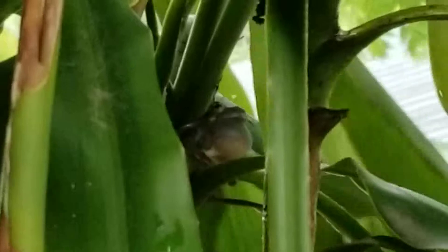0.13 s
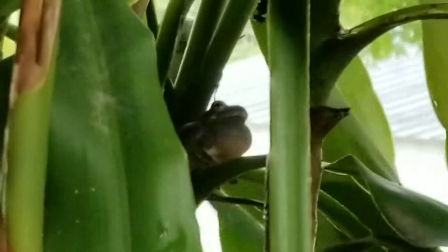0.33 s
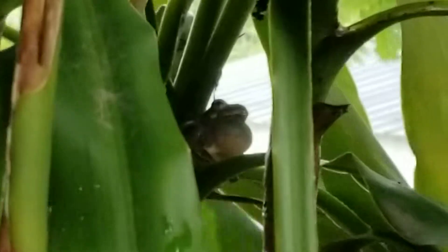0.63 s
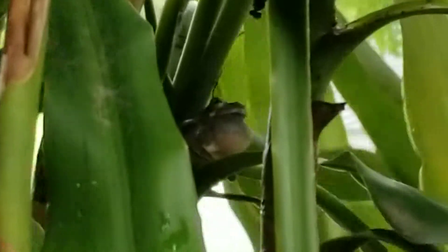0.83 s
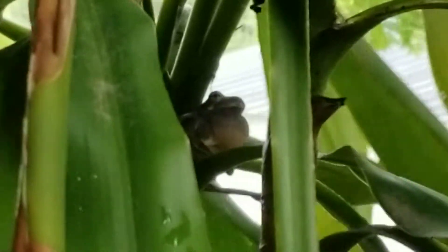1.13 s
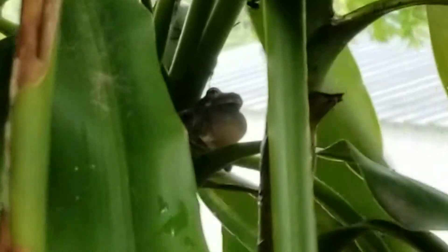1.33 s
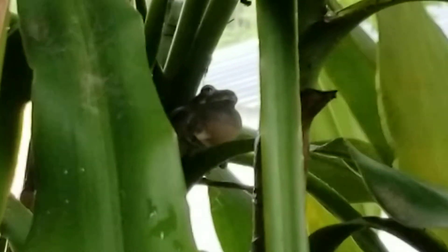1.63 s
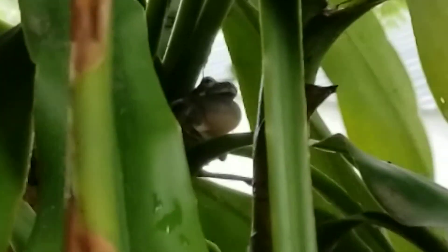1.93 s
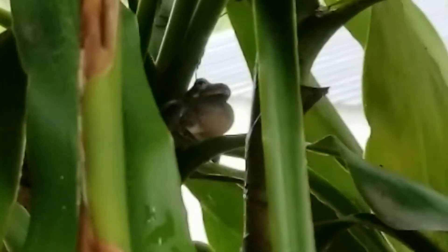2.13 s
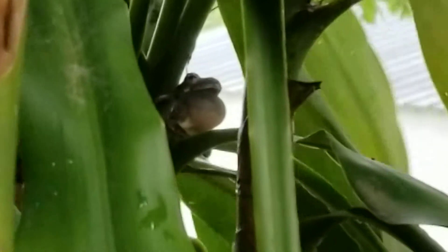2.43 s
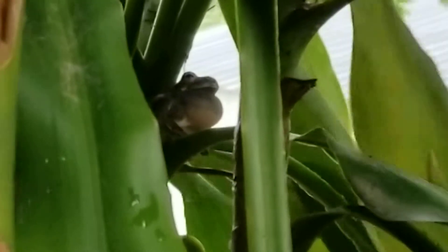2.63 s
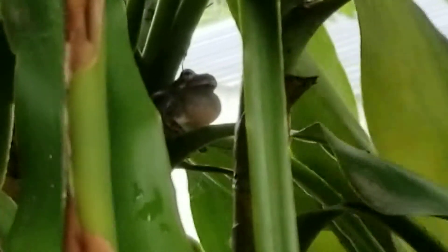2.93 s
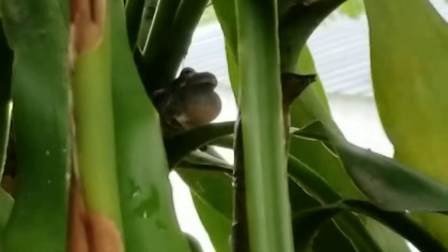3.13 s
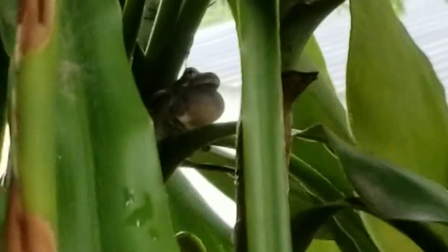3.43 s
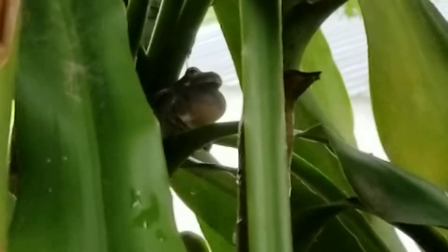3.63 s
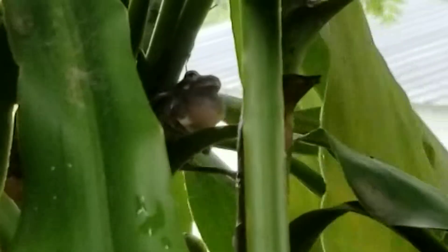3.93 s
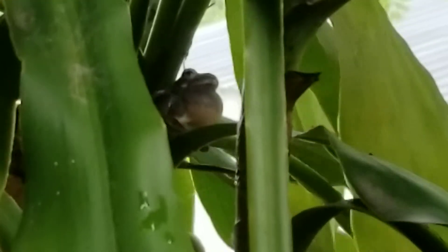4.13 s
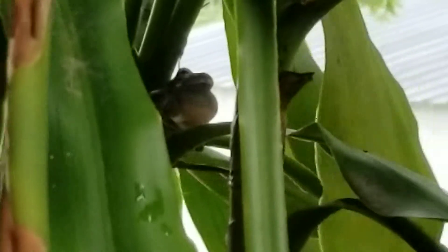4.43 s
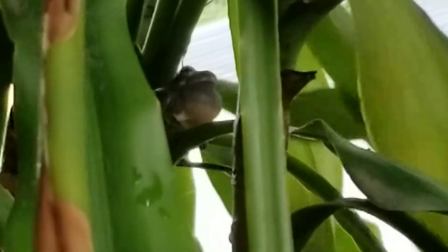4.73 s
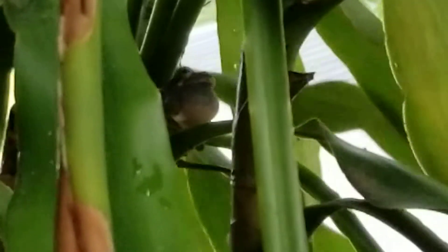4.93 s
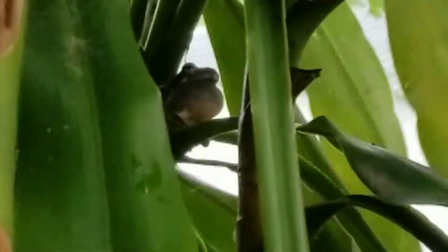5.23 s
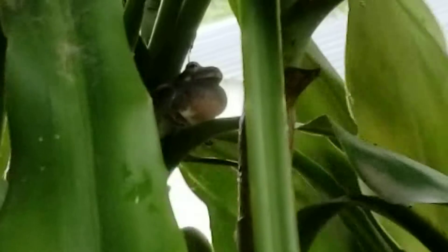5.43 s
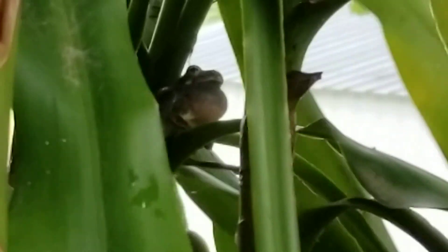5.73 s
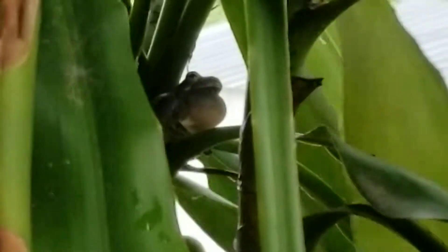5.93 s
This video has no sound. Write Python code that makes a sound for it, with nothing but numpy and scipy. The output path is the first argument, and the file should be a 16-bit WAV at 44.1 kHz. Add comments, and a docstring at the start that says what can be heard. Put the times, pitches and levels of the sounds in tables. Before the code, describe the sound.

Low wind buffets, scattered bird cheeps and lower far-off frog rattles surround one clear, close frog trill of a dozen rapid notes.

```python
"""A small frog on a leafy house plant gives a rattling croak of a dozen quick notes under a roof.
Each note is a pulsed stack of harmonics; lower frogs farther off answer in notes that come by several paths.
Small birds outside chirp in gliding sines, over a twitter of flickering noise bands.
Shaped noise makes the air buffeting the hand-held microphone, the leaves and the scuffs close by.
Single kicks of air hit the ports; noise bursts and ringing modes make a few light knocks and one snap."""
import sys
import numpy as np
from scipy import signal
from scipy.fft import rfft, irfft, next_fast_len
from scipy.io import wavfile
from scipy.ndimage import uniform_filter1d

SR = 44100
rng = np.random.default_rng(int(sys.argv[2]) if len(sys.argv) > 2 else 0)


def bounce(signal):
    """Save signal as a 16-bit WAV file at the path given by the first command-line argument."""
    frames = np.transpose(np.atleast_2d(signal))
    limited = np.clip(frames, -1, 1)
    pcm = np.round(limited * 32767).astype(np.int16)
    wavfile.write(sys.argv[1], SR, pcm)


N = 268789
TIME = np.arange(N) / SR


def amp(db):
    """Decibels to gain."""
    return 10 ** (np.asarray(db) / 20)


def unit(x):
    """Scales to rms 1."""
    return x / np.sqrt(np.mean(x ** 2) + 1e-20)


def steadied(x, size):
    """Holds the running rms near 1, so that only the quick lumps are left."""
    running_power = uniform_filter1d((x ** 2).mean(0), size)
    return x / np.sqrt(running_power + 1e-20)


def add(mix, s, sound):
    """Adds a sound to the mix from time s on."""
    part = mix[..., max(round(s * SR), 0):][..., :sound.shape[-1]]
    part += sound[..., :part.shape[-1]]


def read(points, hz):
    """Reads a spectrum on a log-frequency axis."""
    f, value = np.transpose(points)
    return np.interp(np.log(hz + 1), np.log(f), value)


def colour(x, points):
    """Filters by a spectrum of (Hz, dB) points."""
    size = next_fast_len(x.shape[-1])
    gain = amp(read(points, np.fft.rfftfreq(size, 1 / SR)))
    return irfft(rfft(x, size) * gain, size)[..., :x.shape[-1]]


def drift(per_s, size=N):
    """Random wander of about rms 1, in straight lines between per_s random values a second."""
    knots = rng.standard_normal(4096)
    return np.interp(np.arange(size) / SR * per_s, np.arange(len(knots)), knots) * np.sqrt(3 / 2)


def pair(side_db, size=N):
    """White noise at two close microphone ports: a shared part, and a side part of opposite sign."""
    mid, side = rng.standard_normal((2, size))
    return np.array([mid + amp(side_db) * side, mid - amp(side_db) * side])


def swell(s, hold, rise_s, fall_s):
    """Envelope that rises straight up to time s, holds, and dies away exponentially."""
    rise = np.clip(1 + (TIME - s) / rise_s, 0, 1)
    return rise * np.exp(-np.maximum(TIME - s - hold, 0) / fall_s)


def room(x, t60, side_db):
    """Diffuse echoes of roof and walls: decaying noise of unit energy, 60 dB down after t60 seconds."""
    t = TIME[:SR]
    tail = pair(side_db, size=SR) * amp(-60 * t / t60) * (1 - np.exp(-t / 0.0037))
    return signal.fftconvolve(x[None], tail / np.linalg.norm(tail[0]), axes=1)[:, :N]


def echoed(x, taps):
    """A sound followed by a few distinct reflections."""
    out = x.copy()
    for delay, db in taps:
        add(out, delay, amp(db) * x)
    return out


def strayed(taps, stray_s):
    """The same arrivals with slightly different delays."""
    return [(abs(delay + stray_s * rng.uniform(-1, 1)), db) for delay, db in taps]


AIR_DB, STILL_LEAVES_DB = -55.5, -64.5  # rms of the wash; relative level of the leaves at rest
RUSTLE_RISE_S, RUSTLE_FALL_S = 0.05, 0.04
# Wash and hiss of the open air around the plant. Each row: frequency in Hz, level in dB.
AIR_SPECTRUM = [(18, -17), (30, 0.5), (95, 3), (213, -12), (341, 2.5), (479, -1.5), (606, -11),
                (787, -11.5), (1590, -14.5), (2300, -2), (2990, -16), (4540, -10), (7860, -12.5),
                (12600, -14), (15500, -13)]
# Colour of the leaves, heard close. Each row: frequency in Hz, level in dB.
LEAF_SPECTRUM = [(300, -14), (700, 2), (1500, -1), (3000, 5.5), (5000, 2.5), (8000, -4.5), (10500, 0),
                 (12700, 3.5), (14000, -2.5), (16000, -7.5)]
# Leaves stirring near the microphone. Each row: time of full strength in s, hold in s, relative level in dB.
LEAF_RUSTLES = [(0.21, 0.17, -57), (0.443, 0.31, -60), (1.777, 0.26, -63.5), (2.107, 0.89, -62.5),
                (2.39, 0.17, -61.5), (3.021, 0.038, -58), (3.32, 0.4, -59), (3.99, 0.13, -60.5),
                (4.984, 0.1, -66.5)]


def surroundings():
    """Soft outdoor wash and hiss of drifting noise, with grainier noise for leaves stirring in it."""
    wash = amp(AIR_DB) * unit(colour(pair(-19) * amp(.5 * drift(9.6)), AIR_SPECTRUM))
    grain_db = 1.6 * drift(900) + 4.9 * np.tanh(drift(40))
    leaves = unit(colour(pair(-8.0) * amp(grain_db), LEAF_SPECTRUM))
    power = amp(STILL_LEAVES_DB) ** 2
    for s, hold, db in LEAF_RUSTLES:
        power = power + (amp(db) * swell(s, hold, RUSTLE_RISE_S, RUSTLE_FALL_S)) ** 2
    return wash + amp(4) * np.sqrt(power) * leaves


GUST_RISE_S, GUST_FALL_S = 0.059, 0.028
BREEZE_DB, BREEZE_HARD_DB = -70.5, -4.5  # air between gusts: relative level, and its flutter relative to that
# Gusts striking the microphone.
# Each row: time of full strength in s, hold in s, relative level in dB, hardness (flutter over buffet) in dB.
WIND_GUSTS = [(0.138, 0.15, -40.5, -27), (0.352, 0.016, -33.5, -28), (0.452, 0.011, -42, -32),
              (0.54, 0.046, -54.5, -3), (0.602, 0.88, -65, -0.5), (0.922, 0.032, -74, 12.5),
              (1.123, 0.026, -68, 3.5), (1.575, 0.062, -55.5, 1.5), (1.69, 0.24, -57.5, -8),
              (1.962, 0.14, -49.5, -2), (2.16, 0.16, -50.5, -9), (2.432, 0.32, -65, -3),
              (2.856, 0.038, -61.5, 8), (3.629, .03, -80, -4), (5.034, 0.033, -52, -6.5),
              (5.23, 0.035, -47, -9.5), (5.323, 0.087, -47.5, 0), (5.466, 0.26, -51, 1),
              (5.76, 0.34, -54, -7.5)]
# Low buffeting at the ports. Each row: frequency in Hz, level in dB.
BUFFET_SPECTRUM = [(20, -21), (45, -3.5), (75, -0.5), (110, 0), (160, -4.5), (230, -11.5), (350, -24),
                   (700, -34.5), (1500, -47)]
# Higher flutter of a hard gust at the ports. Each row: frequency in Hz, level in dB.
FLUTTER_SPECTRUM = [(100, -30), (230, 2), (380, 2), (550, -7.5), (900, -17.5), (2000, -41), (5000, -70)]


def wind():
    """Lumpy pressure swings at the ports; hard gusts flutter higher up."""
    soft_power = amp(BREEZE_DB) ** 2
    hard_power = amp(BREEZE_DB + BREEZE_HARD_DB) ** 2
    for s, hold, db, hard_db in WIND_GUSTS:
        push = amp(db) * swell(s, hold, GUST_RISE_S, GUST_FALL_S)
        soft_power = soft_power + push ** 2
        hard_power = hard_power + (amp(hard_db) * push) ** 2
    lumps_db = 7.7 * np.tanh(drift(90))
    buffet = steadied(colour(pair(-15.0) * amp(lumps_db), BUFFET_SPECTRUM), size=2400)
    quick_lumps_db = 11.0 * np.tanh(drift(220))
    flutter = steadied(colour(pair(-38) * amp(quick_lumps_db), FLUTTER_SPECTRUM), size=4000)
    gust = np.sqrt(soft_power) * buffet + amp(-1.5) * np.sqrt(hard_power) * flutter
    return gust * amp([[1.4], [-1.6]])  # the first port takes more of the air


THUMP_S, THUMP_SKEW_DB = 0.0015, 0.5  # time from mid-kick to either peak; largest chance skew of each port
# Single hard buffets on the microphone. Each row: time of mid-kick in s, relative level in dB.
AIR_KICKS = [(0.187, -32), (0.23, -29.5), (.307, -29.5), (0.359, -24), (.484, -37), (0.524, -38)]


def thumps():
    """Sudden kicks of air: a push and the suction after it."""
    out = np.zeros((2, N))
    u = (TIME[:2048] - TIME[1024]) / THUMP_S
    kick = -u * np.exp((1 - u ** 2) / 2)
    for s, db in AIR_KICKS:
        ports = amp(THUMP_SKEW_DB * rng.uniform(-0.73, 1) * np.array([[1], [-1]]))
        add(out, s - TIME[1024], amp(db) * ports * kick)
    return out * amp([[1.4], [-1.6]])  # the first port takes more of the air


# Soft, dull scuffs near the microphone. Each row: time of full strength in s, hold in s, level in dB.
NEARBY_SCUFFS = [(.3, 0.096, -64), (.915, 0.054, -56.5), (1.123, 0.12, -56.5)]
# Their colour. Each row: frequency in Hz, level in dB.
SCUFF_SPECTRUM = [(250, -27), (480, 8), (800, -7), (1250, -3), (1500, 5), (1800, -2.5), (3500, -11),
                  (8000, -28)]


def scuffs():
    """Short rubbing sounds: noise made grainy by fast level changes."""
    power = sum((amp(db) * swell(s, hold, 0.017, 0.028)) ** 2 for s, hold, db in NEARBY_SCUFFS)
    grain_db = 3.1 * np.tanh(drift(200))
    return np.sqrt(power) * unit(colour(pair(-20) * amp(grain_db), SCUFF_SPECTRUM))


def crack(t, decay_s):
    """A hard first contact and a quickly dying spray of tiny clicks."""
    spray = unit(amp(4.5 * np.tanh(drift(1450, size=len(t))))) * np.exp(-t / decay_s)
    return pair(-8, size=len(t)) * (spray + .7 * np.exp(-t / .0006))


TICK_S = 0.0055  # decay of the bright tick at first contact
# Light knocks near the microphone. Each row: start in s, level in dB, rattle's 60 dB decay in s,
# treble at 9 kHz in dB, bass at 500 Hz in dB, room echo in dB, tick in dB, ring in dB.
LIGHT_KNOCKS = [(1.5587, -50, 0.04, 6, -1, -9, -50, -51), (1.563, -43.5, 0.14, 5, -3, -17.5, -47.5, -42),
                (4.782, -38, 0.017, -23, -8, -13, -53, -53), (5.363, -46, 0.038, 2, 3, -18, -62, -62)]
# Colour of the body that the knocks sound in. Each row: frequency in Hz, level in dB.
BODY_SPECTRUM = [(100, -27), (500, 4), (900, -6), (1400, -2), (1800, 5), (2300, 2), (3200, -6),
                 (4500, -3.5), (7000, -9), (15000, -42)]
# Ringing modes of that body. Each row: frequency in Hz, relative level in dB, 60 dB decay in s.
BODY_MODES = [(470, -5.5, .07), (1824, -14.5, 0.12), (2336, 0.5, 0.044), (2606, -5, .09), (4484, 0, .08),
              (5195, -17, .045)]


def knocks():
    """Small dry bumps: a tick, a rattle and the brief ring of a body, with a duller echo."""
    out, echo, t = np.zeros((2, N)), np.zeros(N), TIME[:16384]
    for s, db, t60, treble_db, bass_db, echo_db, tick_db, ring_db in LIGHT_KNOCKS:
        burst = colour(pair(-18, size=len(t)), BODY_SPECTRUM)
        burst = colour(burst, [(500, bass_db), (1500, 0), (3000, 0), (9000, treble_db)])
        rattle = amp(db) * unit(burst) * amp(-60 * t / t60) * (1 - np.exp(-t / 0.00021))
        ring = np.zeros(len(t))
        for hz, mode_db, decay in BODY_MODES:
            ring += amp(ring_db + mode_db - 60 * t / decay) * np.sin(2 * np.pi * hz * t)
        add(out, s, rattle + ring + amp(tick_db) * crack(t, TICK_S))
        add(echo, s, amp(echo_db) * rattle.mean(0))
    dull = [(500, 14.0), (1300, 12.0), (2300, -1), (6000, -5)]
    return out + colour(room(echo, t60=0.54, side_db=-12), dull)


SNAP_S, SNAP_DB, SNAP_DECAY_S, SNAP_ECHO_DB = 3.169, -46, 0.027, -6.5  # start, relative level, decay, echo
# Colour of the snap, heard nearby. Each row: frequency in Hz, level in dB.
SNAP_SPECTRUM = [(500, -12), (1500, -8), (2800, 7), (4000, 3), (8000, -4), (12000, 2.5), (15500, 2)]
# Colour of its hollow echo in the room. Each row: frequency in Hz, level in dB.
ECHO_SPECTRUM = [(300, -12), (800, -3), (1100, -1), (1400, 0), (1600, 4.5), (1780, -1), (1940, 1),
                 (2300, -6), (4000, -3), (8000, -12)]


def snap():
    """One bright crack, answered by a hollow echo of the room to a single impulse."""
    out, kick = np.zeros((2, N)), np.zeros(N)
    add(out, SNAP_S, amp(SNAP_DB) * colour(crack(TIME[:8192], SNAP_DECAY_S), SNAP_SPECTRUM))
    add(kick, SNAP_S, np.ones(1))
    return out + amp(SNAP_ECHO_DB) * colour(room(kick, t60=0.69, side_db=-13), ECHO_SPECTRUM)


# Twitter of many distant birds, joined by straight lines. Each row: time in s, relative level in dB.
TWITTER_LEVEL = [(.1, -58), (1.25, -57.5), (1.42, -66), (1.65, -62.5), (2.5, -57.5), (3.1, -59.5),
                 (3.33, -60.5), (3.5, -57), (4.0, -57), (4.6, -64.5), (5.1, -71), (5.7, -64.5), (6.05, -58)]
# Its spread of pitch. Each row: frequency in Hz, level in dB.
TWITTER_SPECTRUM = [(1500, -38), (2300, 2.5), (3000, -0.5), (4300, -0.5), (5200, -3.5), (6500, -8.5),
                    (9000, -12)]


def twitter():
    """Faint chirps blurred into a haze: sixteen narrow noise bands that flicker independently."""
    haze = np.zeros((2, N))
    for hz in np.geomspace(2400, 7500, num=16):
        band = [(hz / 1.15, -50), (hz / 1.025, 0), (hz * 1.025, 0), (hz * 1.15, -50)]
        flicker_db = 6 * np.tanh(drift(35))
        haze += colour(pair(-11), band) * amp(flicker_db)
    level_db = np.interp(TIME, *np.transpose(TWITTER_LEVEL)) + 1.5
    return amp(level_db) * unit(colour(haze, TWITTER_SPECTRUM))


# pitch flutter as a share of the pitch, and its growth per octave a second of glide
RASP_SHARE, RASP_PER_SWEEP = 0.021, .0022


def glide(length, hz, octaves, taper):
    """One gliding whistle, raspier the faster it sweeps, up to 8 octaves a second."""
    u = np.linspace(0, 1, max(int(length * SR), 64))
    sweep = min(abs(octaves) / length, 8)
    rasp = (RASP_SHARE + RASP_PER_SWEEP * sweep) * drift(480, size=len(u))
    pitch = hz * 2 ** (octaves * u) * (1 + rasp)
    return np.sin(2 * np.pi * np.cumsum(pitch) / SR) * signal.windows.tukey(len(u), taper)


PIP_S, PIP_RISE_OCT = 0.0247, 0.153  # length, and rise in octaves
ECHO_STRAY_S = .004  # largest chance shift of an echo delay, new for each cheep
# Cheeps outside, each one steep downward stroke.
# Each row: start in s, length in s, starting pitch in Hz, fall in octaves, relative level in dB.
BIRD_CHEEPS = [(0.264, 0.04, 4310, 0.35, -50), (0.316, 0.033, 5390, 0.47, -49.5),
               (0.351, 0.034, 5350, 0.73, -45.5), (.368, 0.017, 5320, 0.57, -47),
               (.558, 0.025, 4840, 0.37, -48.5), (0.948, 0.035, 4900, 0.49, -48),
               (1.004, 0.03, 4610, 0.63, -47.5), (1.058, 0.028, 4930, 0.51, -48.5),
               (1.176, 0.036, 4830, 0.42, -50.5), (1.596, .024, 5100, 0.54, -47),
               (1.655, 0.037, 4620, 0.76, -48.5), (1.727, 0.026, 4590, 0.34, -49.5),
               (1.977, 0.054, 4950, 0.54, -51.5), (2.24, 0.024, 4820, 0.48, -45),
               (2.276, 0.026, 4860, 0.49, -42), (2.304, 0.023, 4700, 0.56, -46.5),
               (2.337, 0.03, 4950, 0.73, -51), (2.69, 0.042, 4890, 0.45, -48.5),
               (3.018, 0.036, 5190, 0.47, -48), (3.392, 0.0274, 4510, 0.5, -44),
               (3.54, 0.02, 4680, 0.37, -47), (3.754, 0.022, 5400, 0.7, -49),
               (4.431, 0.035, 4850, 0.41, -50), (4.476, 0.026, 4656, 0.68, -46),
               (5.284, 0.017, 4680, 0.44, -45.5), (5.313, 0.04, 4420, 0.68, -48),
               (5.376, 0.025, 4775, 0.73, -45.5), (5.94, 0.022, 4650, 0.42, -45.5),
               (5.985, 0.028, 5205, 0.7, -49)]
# Short rising pips outside. Each row: start in s, starting pitch in Hz, relative level in dB.
BIRD_PIPS = [(0.198, 2950, -44), (.312, 2950, -41.5), (0.615, 3080, -46), (.977, 3950, -42.5),
             (1.235, 3080, -42), (2.445, 3650, -50), (3.848, 4080, -44), (3.878, 4100, -50),
             (4.125, 4600, -55), (4.363, 4300, -57)]
# Short and longer whistles outside, mostly near-level in pitch, a few gliding.
# Each row: start in s, length in s, starting pitch in Hz, glide in octaves, relative level in dB.
BIRD_WHISTLES = [(0.09, 0.057, 3330, -0.061, -46.5), (0.662, 0.055, 4890, 0.019, -42.5),
                 (1.061, 0.02, 2830, -0.017, -44), (1.202, 0.026, 3500, -0.069, -51),
                 (1.204, 0.043, 776, -0.063, -56), (1.318, 0.049, 3190, -0.071, -42),
                 (1.358, 0.025, 3100, -.24, -48), (1.929, 0.06, 3300, -0.16, -49),
                 (2.219, 0.051, 4850, -.03, -52.5), (2.606, 0.072, 3010, -0.065, -52),
                 (2.633, 0.047, 4480, 0.11, -47.5), (3.395, 0.063, 4300, 0, -48),
                 (3.432, 0.021, 3450, -0.068, -40), (3.467, 0.092, 668, 0.26, -59),
                 (3.576, 0.06, 4920, 0.0018, -56), (3.708, 0.083, 6010, -0.15, -55),
                 (4.233, 0.022, 5880, 0.037, -54), (4.977, 0.15, 8600, -0.39, -61)]
# Early echoes of the birds off walls and roof. Each row: delay in s, level in dB.
WALL_ECHOES = [(0.011, -10), (.032, -14.5), (0.046, -12), (.07, -15.5)]


def birds():
    """Cheeps, pips and whistles of single sines, repeated by the walls and trailing off in the room."""
    cheeps, tones = np.zeros((2, N))
    for s, length, hz, fall, db in BIRD_CHEEPS:
        stroke = amp(db) * glide(length, hz, -fall, taper=0.22)
        stroke = np.pad(stroke, (0, SR // 8))  # space for the echoes
        add(cheeps, s, echoed(stroke, strayed(WALL_ECHOES, ECHO_STRAY_S)))
    for s, hz, db in BIRD_PIPS:
        add(tones, s, amp(db) * glide(PIP_S, hz, PIP_RISE_OCT, taper=0.6))
    for s, length, hz, octaves, db in BIRD_WHISTLES:
        add(tones, s, amp(db) * glide(length, hz, octaves, taper=0.37))
    early = amp(-3) * cheeps + amp(-2.0) * echoed(tones, WALL_ECHOES)
    scattered = room(cheeps + amp(-4.5) * tones, t60=0.062, side_db=-7.5)  # through the foliage
    late = room(cheeps + amp(-2.5) * tones, t60=0.5, side_db=-11.5)
    return early + amp(-5.5) * scattered + amp(-2) * late


def frog_note(hz, rise_s, fall_s, arch, low_db, high_db, rough):
    """One squeeze of air: pitch arches with pressure; the second harmonic is strong, the others rasp."""
    t = TIME[:2560] - TIME[1280]
    # rise_s before the peak and fall_s after it, the pressure is at half
    pressure = 1 / (1 + (t / np.where(t < 0, rise_s, fall_s)) ** 2)
    jitter, shimmer, low_rasp, high_rasp = (drift(400, size=len(t)) for _ in range(4))
    pitch = hz * (1 + arch * (pressure ** 1.676 - .66) + 0.013 * jitter)
    phase = np.pi * np.cumsum(pitch) / SR  # of the fundamental, at half the strongest partial
    low = amp(low_db) * np.sin(phase) * (0.56 + low_rasp)
    high = amp(high_db) * (np.sin(3 * phase) + 0.1 * np.sin(4 * phase)) * high_rasp
    main = np.sin(2 * phase) * (1 + rough * shimmer)
    return (main * pressure + (low + high) * pressure ** 1.3) * signal.windows.tukey(len(t), .4)


# a distant croak starts soft and flat, swells to full effort, then tires slowly
SWELL_DB, FLAT_HZ, TIRE_DB_PER_S = 7, 59.7, 0.5
FAR_UNEVEN_DB, UNEVEN_HZ, FAR_STRAY_S = 1.5, 31.5, .003  # chance differences from note to note


def croak(start, length, period, swell_s, db, hz, uneven_db):
    """Evenly spaced notes whose level and pitch follow the effort: rows of (s, dB, Hz)."""
    t = np.arange(0, length, period)
    slack = np.exp(-t / swell_s)
    louder, higher = rng.standard_normal((len(t), 2)).T
    level_db = db - SWELL_DB * slack - TIRE_DB_PER_S * t + uneven_db * louder
    return zip(start + t, level_db, hz - FLAT_HZ * slack + UNEVEN_HZ * higher)


PATH_STRAY_S = 0.001496  # largest chance shift of a path from note to note
# Croaks from farther off. Each row: first note in s, length in s, note spacing in s, swell time in s,
# relative level in dB, strongest partial at full effort in Hz, fundamental in dB.
DISTANT_CROAKS = [(0.57, .7, 0.037, 0.12, -39, 2215, -10.5), (2.278, .7, 0.04, 0.069, -43, 2205, -12.5),
                  (4.452, .58, 0.046, 0.041, -49.5, 2306, -27), (5.444, .68, 0.04, 0.11, -39, 2180, -12)]
# Paths by which a distant note reaches the microphone. Each row: delay in s, level in dB.
DISTANT_PATHS = [(0, -1.5), (.0045, -1.5), (.011, -4), (.017, -3), (.024, -8.5), (.031, -13.5)]
# What the distant vocal sacs radiate. Each row: frequency in Hz, level in dB.
DISTANT_SAC_SPECTRUM = [(800, -6.5), (1080, -1), (1280, 1), (1550, 2), (1800, 1.5), (2050, 1.5),
                        (2250, 0.5), (2600, 2.5), (3000, -7)]


def far_frogs():
    """Lower croaks; each short note arrives by several paths, which makes a fine, uneven rattle."""
    out = np.zeros((2, N))
    for *call, low_db in DISTANT_CROAKS:
        for s, db, hz in croak(*call, FAR_UNEVEN_DB):
            start = s + FAR_STRAY_S * rng.standard_normal()
            for delay, path_db in strayed(DISTANT_PATHS, PATH_STRAY_S):
                note = frog_note(hz, rise_s=0.0025, fall_s=0.0028, arch=0.141,
                                 low_db=low_db, high_db=-42, rough=0.29)
                ports = 1 + 0.63 * rng.uniform(-1.15, 1) * np.array([[1], [-1]])
                add(out, start + delay - len(note) / 2 / SR, amp(db + path_db) * ports * note)
    out = colour(out, DISTANT_SAC_SPECTRUM)
    return amp(-4.0) * out + amp(-5) * room(out.mean(0), t60=0.76, side_db=-7)


# the fundamental at full effort, and the dB it gains per dB that a note is softer
FUNDAMENTAL_DB, SOFT_HOLLOW = -28.5, 0.83
# Notes of the near frog's croak. Each row: mid-note in s, relative level in dB, strongest partial in Hz.
CROAK_NOTES = [(3.706, -54, 2570), (3.758, -41.5, 2565), (3.804, -33.5, 2635), (3.853, -31, 2660),
               (3.901, -33, 2640), (3.952, -30.5, 2670), (4, -26.5, 2672), (4.051, -28, 2683),
               (4.103, -28.5, 2658), (4.155, -30.5, 2690), (4.205, -33, 2637), (4.258, -30, 2670)]
# Slaps from surfaces close to the frog. Each row: delay in s, level in dB.
CLOSE_SLAPS = [(.0034, -20), (.0065, -15.5), (0.0201, -17.5), (.026, -16)]
# What its vocal sac radiates. Each row: frequency in Hz, level in dB.
SAC_SPECTRUM = [(950, 1), (1250, 4), (1500, 2), (1700, 0), (2150, 6.5), (2450, 1), (2830, 0.5), (3030, -13),
                (3600, 1.5)]


def near_frog():
    """Quick notes, each followed by slaps from nearby surfaces and the ring of the room."""
    voice = np.zeros(N)
    loudest_db = max(db for _, db, _ in CROAK_NOTES)
    for s, db, hz in CROAK_NOTES:
        low_db = FUNDAMENTAL_DB + SOFT_HOLLOW * (loudest_db - db)
        note = amp(db) * frog_note(hz, rise_s=0.00854, fall_s=0.0072, arch=0.0977,
                                   low_db=low_db, high_db=-26.0, rough=0.45)
        add(voice, s - len(note) / 2 / SR, note)
    voice = colour(echoed(voice, CLOSE_SLAPS), SAC_SPECTRUM)
    # the weak partials come mostly by way of the walls
    spread = colour(voice, [(1400, 9.5), (2400, 9.5), (2800, -5), (3800, 5)])
    return amp(-1.0) * voice + amp(-8.5) * room(spread, t60=1.0, side_db=-7.0)


def scene():
    """All sources at the microphone."""
    background = surroundings() + wind() + thumps()
    contacts = scuffs() + knocks() + snap()
    return background + contacts + twitter() + birds() + far_frogs() + near_frog()


START_S, EDGE_HZ = .104, 15850  # silence before the microphone opens; upper band limit


def record(dry):
    """The microphone opens after a moment; then the band limit."""
    opened = dry * np.clip((TIME - START_S) / 0.0011, 0, 1)
    lowpass = signal.firwin(611, EDGE_HZ, window=("kaiser", 8), fs=SR)
    return signal.oaconvolve(opened, lowpass[None], "same")


dry = scene()
out = record(dry)
bounce(out)
```